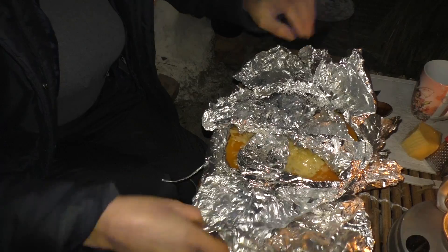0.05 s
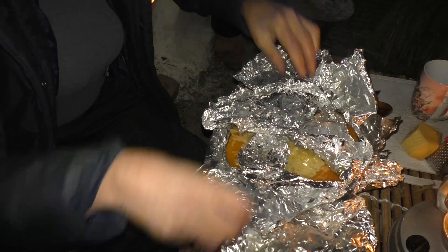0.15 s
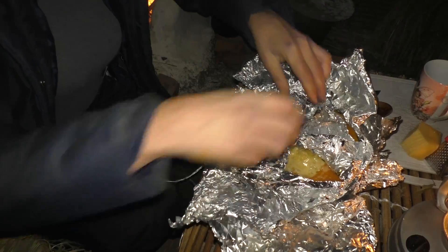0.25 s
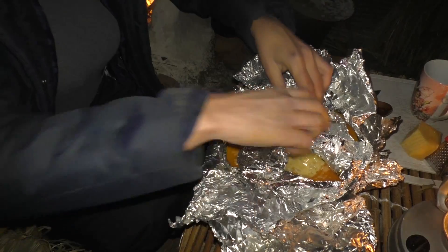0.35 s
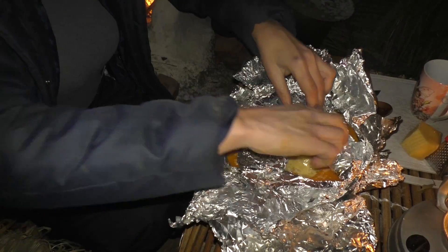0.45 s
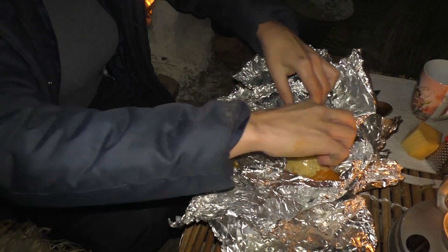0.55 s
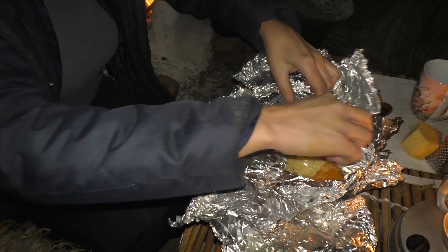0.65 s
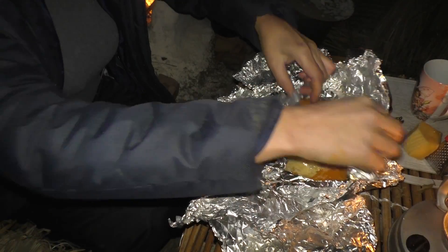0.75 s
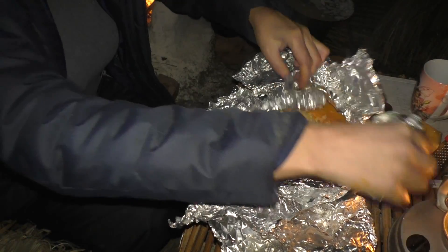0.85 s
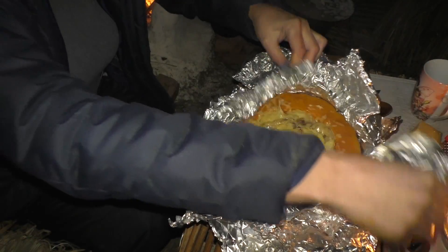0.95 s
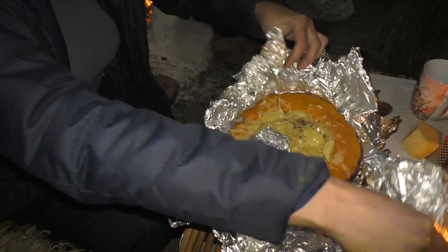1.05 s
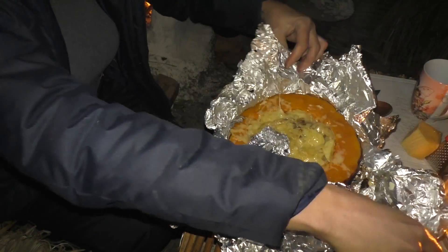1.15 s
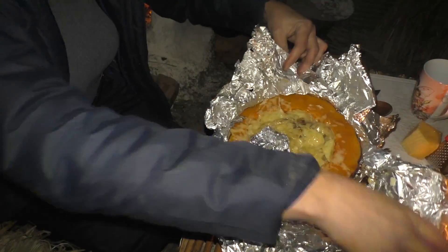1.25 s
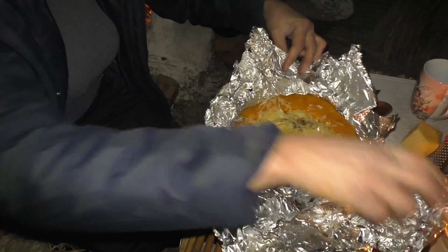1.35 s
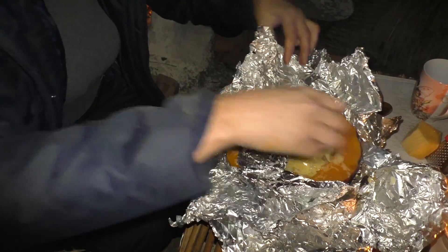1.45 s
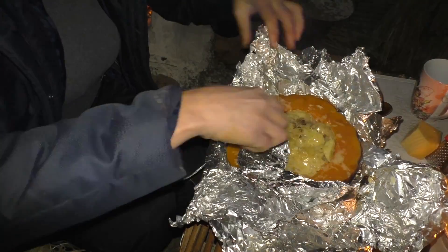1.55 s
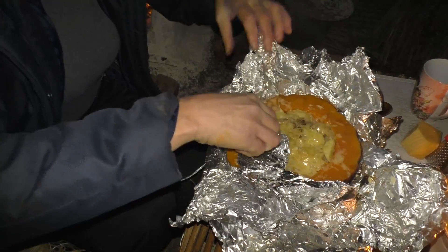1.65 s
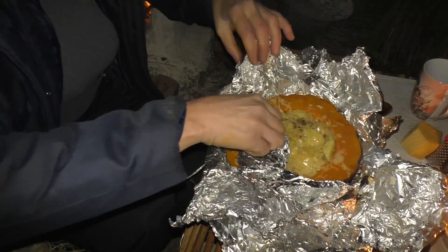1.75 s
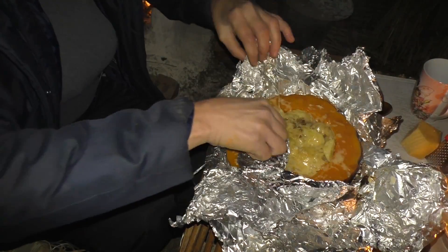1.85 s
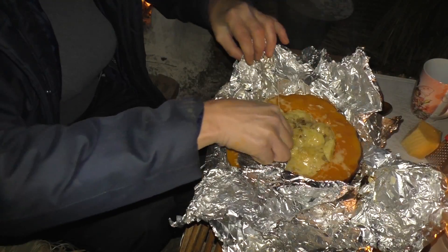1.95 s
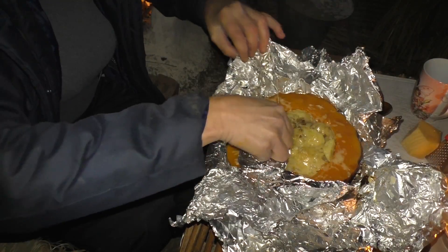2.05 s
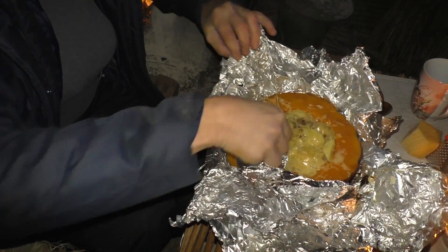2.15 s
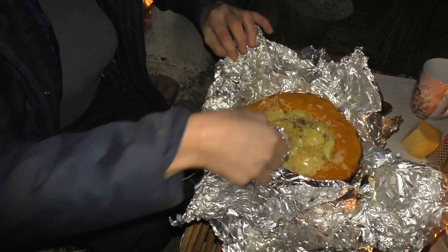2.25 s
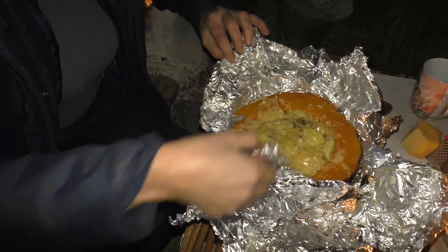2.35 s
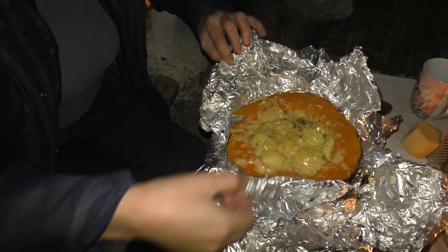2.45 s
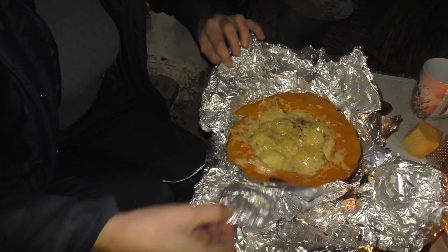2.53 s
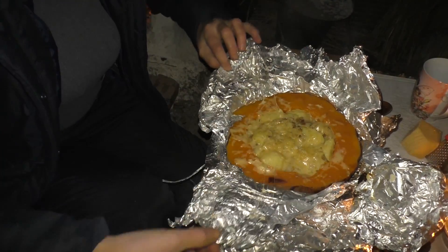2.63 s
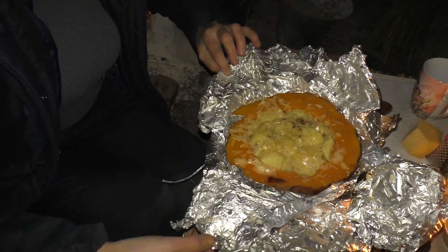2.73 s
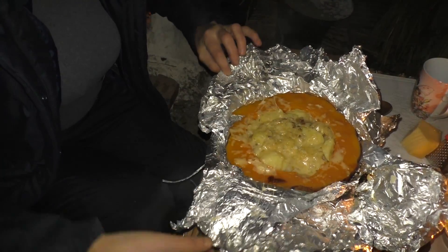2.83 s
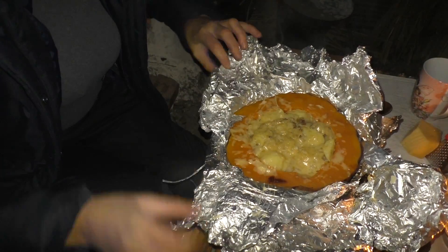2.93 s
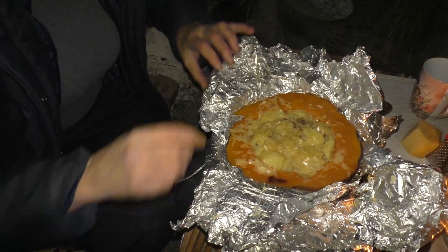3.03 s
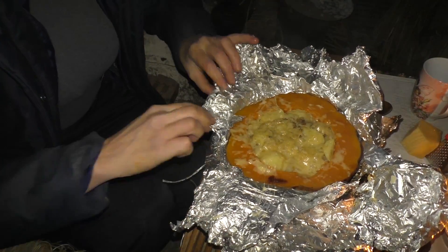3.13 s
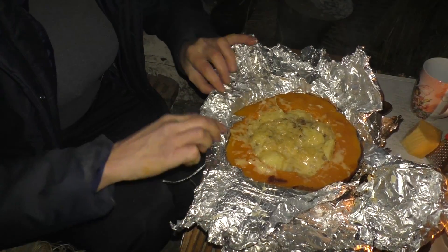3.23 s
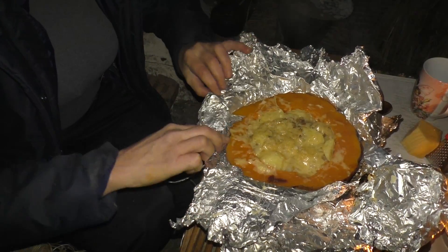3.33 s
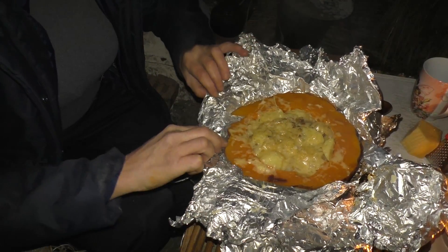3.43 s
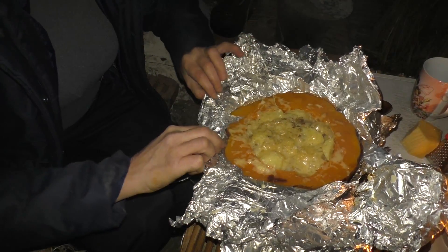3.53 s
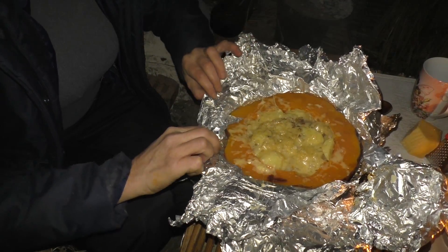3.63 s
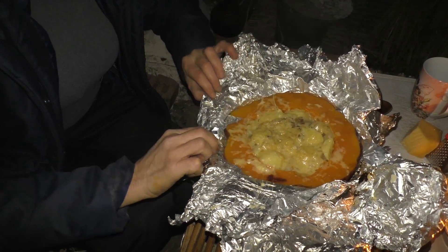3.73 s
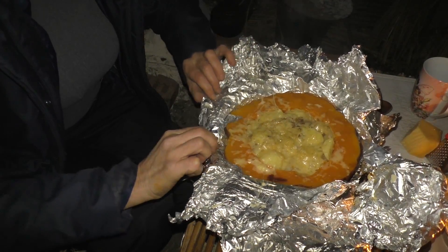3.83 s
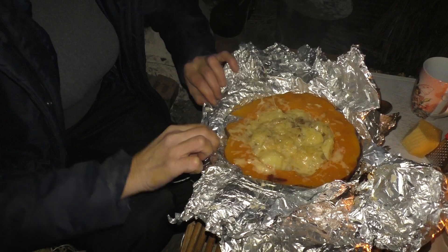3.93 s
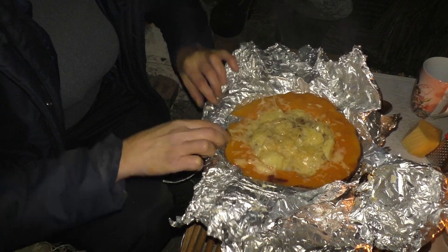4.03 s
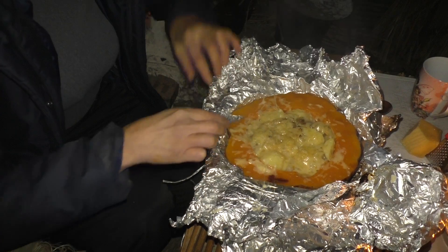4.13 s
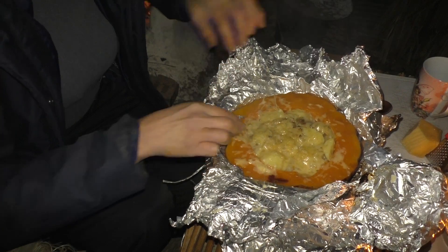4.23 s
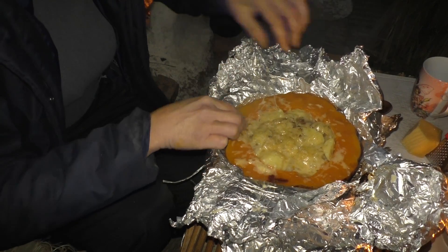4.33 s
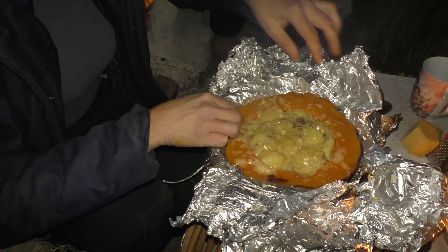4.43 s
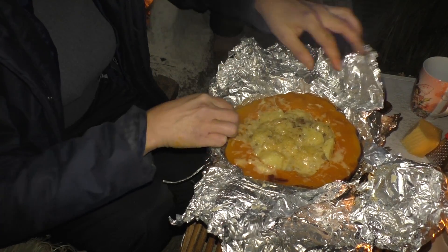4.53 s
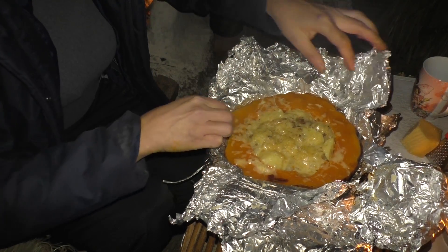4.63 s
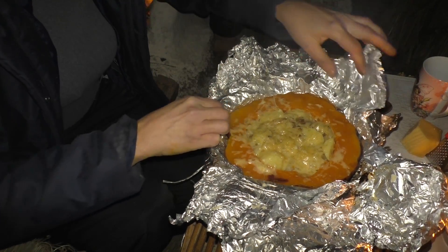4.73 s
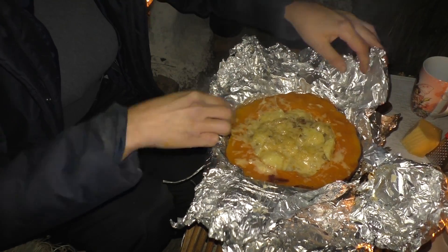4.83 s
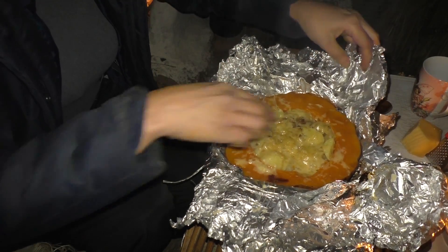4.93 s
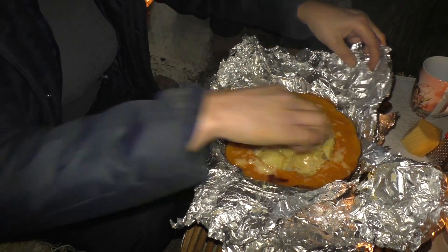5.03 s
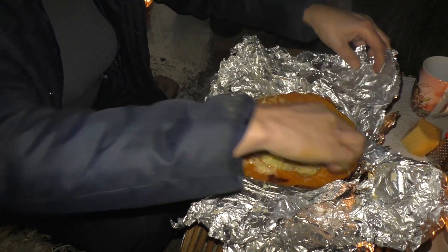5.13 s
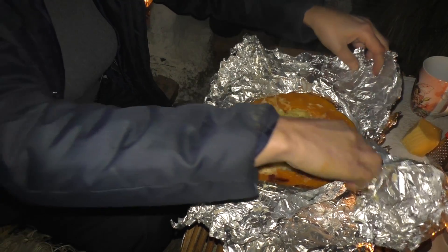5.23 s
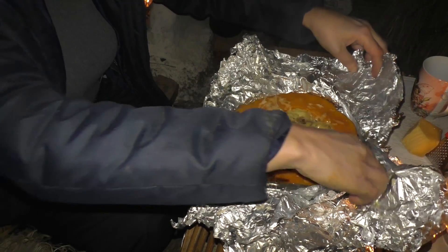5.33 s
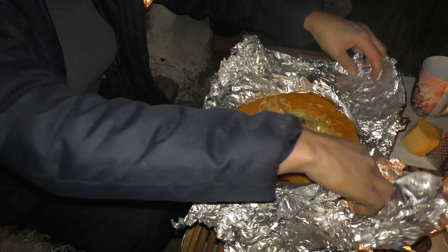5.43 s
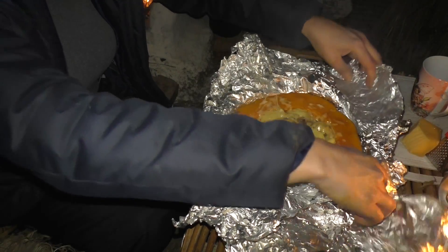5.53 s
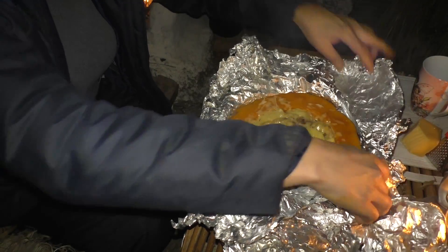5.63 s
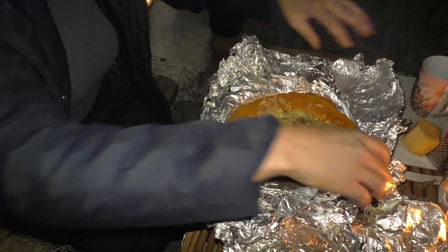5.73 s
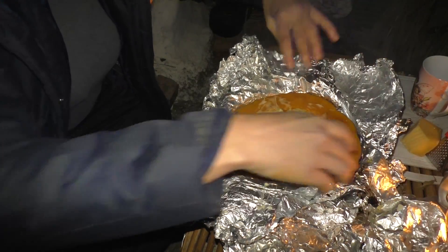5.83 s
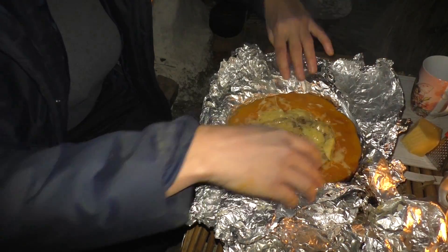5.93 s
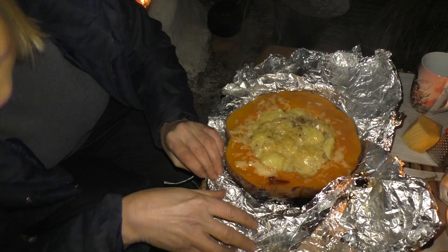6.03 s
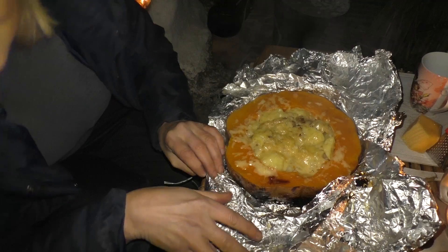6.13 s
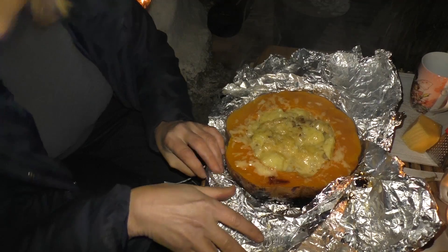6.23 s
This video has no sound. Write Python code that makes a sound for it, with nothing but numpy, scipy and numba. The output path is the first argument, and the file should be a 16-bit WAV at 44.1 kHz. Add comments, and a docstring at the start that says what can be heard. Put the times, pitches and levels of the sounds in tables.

```python
"""A small room, close up: two hands peel crumpled aluminium foil back from a baked, filled loaf.
Bending makes countless tiny facets buckle and ring, lesser creases tick and the whole sheet flutters.
Now and then a crease snaps and sets off a run of buckles, or a large free facet pings.
Fingers bump the loaf and the sheet under it, over faint low room noise and microphone hiss."""
import sys
import numpy as np
from scipy import signal
from scipy.fft import rfft, irfft, next_fast_len
from scipy.io import wavfile
from scipy.ndimage import uniform_filter1d, map_coordinates
from numba import njit

SR = 44100
rng = np.random.default_rng(int(sys.argv[2]) if len(sys.argv) > 2 else 0)


def int16_out(signal):
    """Quantize to a 16-bit WAV file."""
    q = np.round(np.clip(np.atleast_2d(signal).T, -1, 1) * 32767)
    wavfile.write(sys.argv[1], SR, q.astype(np.int16))


N = 276948
TIME_S = np.arange(N) / SR
TOP_HZ = 15900
SIDE = np.array([[1], [-1]])

# Event levels are relative, before the mix gains.
# hand pulls and pushes: (start [s], length [s], crinkle level [dB], treble over body [dB])
FOLDS = [(-0.03, 0.095, -21.5, 1.5), (0.075, 0.15, -34.5, 0), (0.375, 0.19, -43.5, -5),
         (0.647, 0.11, -40, -1), (0.734, 0.16, -33.5, 0), (0.868, 0.062, -24.5, 0), (0.963, 0.08, -36, 0),
         (1.056, 0.067, -28.5, 1), (1.116, 0.063, -22.5, 2), (1.224, 0.15, -29.5, -3),
         (1.446, 0.079, -34.5, -3.5), (2.015, 0.4, -42, -2.5), (2.24, 0.1, -35.5, -2.5),
         (2.35, 0.43, -35.5, 0.5), (2.584, 0.23, -29.5, 0), (2.892, 0.12, -30, -3.5),
         (3.163, 0.097, -34, -1), (3.296, .15, -32.5, -2.5), (3.487, 0.16, -35.5, -3.5),
         (3.65, 0.075, -33, 1.5), (3.779, 0.217, -34, -1.5), (4.002, 0.18, -34.5, -0.5),
         (4.243, 0.22, -43.5, -3.5), (4.485, 0.25, -36, -4), (4.856, 0.26, -36, -4.5),
         (5.04, .15, -36.5, -1.5), (5.187, 0.44, -29.5, -2), (5.47, 0.22, -21.5, -1),
         (5.903, 0.38, -42, -6.5), (6.12, 0.2, -37.5, -1.5)]
# snapping creases: (time [s], run level [dB], treble over body [dB], run decay [s])
SNAPS = [(0.102, -35, 8, 0.0057), (0.247, -31, 8, 0.011), (0.387, -32, -3.5, 0.0094),
         (0.534, -30.5, 3, 0.02), (0.561, -48, 15, 0.0024), (0.632, -35, 4.5, 0.036),
         (0.689, -22, -4, 0.0032), (0.726, -24, -4, 0.0061), (0.767, -25, -9, 0.013),
         (0.907, -29, -8, 0.024), (0.935, -19.5, 3.5, 0.0046), (1.053, -19, -2, 0.0061),
         (1.059, -19, -3.5, .004), (1.096, -26, 1, 0.0089), (1.202, -17.5, -2, 0.0053),
         (1.34, -23, -6, .013), (1.369, -22, -5, 0.0028), (1.403, -31, 9.5, 0.011), (1.479, -28, -3, 0.02),
         (1.587, -17.5, -10.5, 0.0062), (1.901, -34, -3.5, 0.026), (2.09, -43.5, 13, 0.0033),
         (2.136, -36.5, 1, 0.014), (2.204, -39, 11, 0.011), (2.2237, -38, 17.5, 0.0033),
         (2.41, -26.5, 3.5, 0.0082), (2.43, -21, 1.5, 0.008), (2.465, -41, 15, 0.0027),
         (2.554, -26.5, -1.5, 0.0036), (2.617, -16, -6, 0.0043), (2.733, -24.5, 8, 0.0081),
         (2.822, -42.5, 24, 0.007), (2.853, -23, -1, .005), (2.947, -17, -6.5, 0.0064),
         (2.869, -23.5, -11, 0.0087), (3.018, -28, -12, .004), (3.058, -36.5, 15.5, 0.0027),
         (3.225, -22.5, 4.5, 0.0074), (3.237, -22.5, 0, 0.0093), (3.323, -21.5, 0, .006),
         (3.333, -24.5, -8, 0.0035), (3.5, -29.5, 10, 0.0042), (3.585, -26, 1, 0.0038),
         (3.699, -19, -6, .014), (3.827, -35.5, 5, 0.01), (3.916, -27.5, -8, 0.015),
         (3.971, -24, 2, 0.0047), (4.026, -23.5, 2, .015), (4.068, -19, 0.5, 0.006),
         (4.119, -21.5, -5.5, 0.01), (4.228, -27.5, -2, 0.0037), (4.35, -31.5, 2, 0.024),
         (4.634, -23, 2.5, 0.0026), (4.67, -38.5, 15, 0.0071), (4.717, -31, 5, 0.021),
         (4.807, -30, -3.5, 0.023), (4.914, -27.5, 0.5, .013), (4.953, -42, 17.5, 0.0094),
         (4.986, -26, -0.5, 0.017), (5.024, -24.5, 7.5, 0.012), (5.211, -28, 0, 0.0037),
         (5.346, -16.5, -3, 0.016), (5.4, -25, 1, 0.026), (5.481, -24, -3, 0.018), (5.552, -20, 3.5, 0.018),
         (5.707, -24.5, -2, 0.021), (5.921, -27, -12, 0.0057), (5.958, -28, 0.5, 0.0085),
         (6.025, -28, -7.5, 0.0091), (6.092, -29, 5.5, 0.0099), (6.159, -28.5, -1, 0.0068),
         (6.169, -27, 6, 0.016), (6.196, -23, -17, 0.0054)]
# fingers on the loaf: (time [s], level [dB], pitch [Hz])
BUMPS = [(0.887, -28.5, 280), (0.932, -28, 235), (1.058, -31, 470), (1.163, -24, 318), (1.202, -23, 360),
         (1.585, -23, 310), (1.625, -39, 109), (1.776, -38, 120), (1.854, -39, 126), (2.428, -28.5, 460),
         (3.235, -27.5, 330), (3.912, -31, 427), (4.034, -35, 325), (4.068, -29, 380), (4.721, -29, 298),
         (5.342, -29, 327)]
# large free facets: (time [s], level [dB], pitch [Hz])
PINGS = [(1.032, -23.5, 1360), (1.058, -16, 1260), (1.097, -20, 4100), (1.37, -26, 1710),
         (1.481, -25, 1580), (1.495, -23, 2060), (2.616, -20, 1420), (2.869, -31, 1360), (2.946, -21, 1580),
         (3.191, -23.5, 3250), (3.382, -24.5, 1390), (3.499, -19.5, 4520), (3.886, -25.5, 1390),
         (3.97, -14, 3080), (4.039, -21, 1420), (4.634, -21, 2370), (4.913, -26, 1340), (5.212, -24, 2380),
         (5.347, -14.5, 2390)]
# where the foil is worked: (time [s], leftward pan [dB])
PAN = [(0.0, -3), (0.35, 1.5), (0.52, -3), (1.28, -4.5), (1.7, -0.5), (2.76, -2.5), (3.02, -2.0),
       (3.18, -1.5), (4.3, -1.5), (5.32, -3.5), (5.81, -3), (5.96, -1.5), (6.28, -0.5)]
# radiation of the crumpled sheet: (frequency [Hz], gain [dB])
SHEET_SPECTRUM = [(400, -33), (800, -14), (1060, -0.5), (1380, 2), (1650, -2), (1920, 0.5), (3200, -1.5),
                  (3950, -5), (4700, -10.5), (6300, -13.5), (8650, -8.5), (11800, -7), (14000, -14),
                  (16000, -17)]
# whole sheet flexing: (frequency [Hz], gain [dB])
FLEX_SPECTRUM = [(40, -27.5), (110, -1.5), (200, -3.5), (330, 0), (450, -2.5), (620, -9), (780, -6.5),
                 (1100, -32), (3000, -58)]
# still room: (frequency [Hz], gain [dB])
ROOM_SPECTRUM = [(20, -15), (60, -2), (115, -1), (200, -8.5), (370, -8), (600, -17.5), (780, -4.5),
                 (1100, -21), (1550, -4), (1900, -15), (4000, -48), (16000, -62)]
# difference between the two microphones: (frequency [Hz], gain [dB])
SIDE_EQ = [(150, 3.5), (600, -3.5), (1300, -5), (2600, -2), (6000, -2.5), (9000, -9.5), (13000, 2.5)]


def amp(db):
    """Decibels to gain."""
    return 10 ** (np.asarray(db) / 20)


def unit(x):
    """Scale to rms 1."""
    return x / np.sqrt(np.mean(x ** 2))


def add(track, start_s, sound):
    """Mix a sound into a track."""
    i = max(int(start_s * SR), 0)
    track[..., i:i + sound.shape[-1]] += sound[..., :N - i]


def butter(x, order, hz, kind):
    """Butterworth filter."""
    return signal.sosfilt(signal.butter(order, hz, kind, fs=SR, output="sos"), x)


def colour(x, spectrum):
    """Minimum-phase filter through (frequency [Hz], gain [dB]) points."""
    hz, db = np.transpose(spectrum)
    size = next_fast_len(N + 8192)
    bins_hz = np.maximum(np.arange(size // 2 + 1) * SR / size, 1)
    gain = amp(np.interp(np.log(bins_hz), np.log(hz), db))
    cepstrum = irfft(np.log(gain), size)
    cepstrum[1:size // 2] *= 2
    cepstrum[size // 2 + 1:] = 0
    return irfft(rfft(x, size) * np.exp(rfft(cepstrum)), size)[..., :N]


def steady(x, span_s):
    """Hold power at 1 over a span; finer grain stays."""
    power = uniform_filter1d(np.mean(x ** 2, axis=0), int(span_s * SR))
    return x / np.sqrt(power + 1e-12)


def stereo_noise(side_db):
    """White noise, common to both channels but for a weaker side part."""
    mid, side = rng.standard_normal((2, N))
    return mid + amp(side_db) * side * SIDE


def folding(attack_s=0.022, swell_db=2.5, release_s=0.051):
    """Body and treble gains: each fold grips, swells as the foil resists, dies as the hand stops."""
    power = amp([[-50.5], [-54.5]]) ** 2 * np.ones(N)  # resting fingers keep the sheet astir
    for start_s, length_s, db, treble_db in FOLDS:
        age_s = TIME_S - start_s
        grip = np.clip(age_s / attack_s, 0, 1)
        swell = amp(swell_db * (np.clip(age_s / length_s, 0, 1) - 1.5))
        release = np.exp(-np.maximum(age_s - length_s, 0) / release_s)
        power += (amp([[db], [db + treble_db]]) * grip * swell * release) ** 2
    return np.sqrt(power)


def stick_and_yield(depth_db, per_s):
    """Random gain swings as the foil gives way in fits."""
    wander = map_coordinates(rng.standard_normal(1024), [TIME_S * per_s], order=2, mode="wrap")
    return amp(depth_db * wander)


@njit
def ring(start, hz, cycles, left, right):
    """Sum of damped sines, each falling by 1/e in `cycles` periods."""
    out = np.zeros((2, N))
    for k in range(len(start)):
        step = hz[k] / SR
        pole, z = np.exp(2j * np.pi * step - step / cycles), 1 + 0j
        for i in range(int(start[k]), min(N, int(start[k] + 5 * cycles / step))):
            z *= pole
            out[0, i] += left[k] * z.imag
            out[1, i] += right[k] * z.imag
    return out


def buckles(per_s, scatter_db, cycles, spread, modes=5):
    """Facets pop at random, many weak and few strong, each with a few short modes."""
    draws = rng.random((40000, 3 + 3 * modes))[:int(per_s * N / SR)]
    when, rank, side = draws[:, :3].T[:, :, None]
    pitch, share, lobe = np.split(draws[:, 3:], 3, axis=1)
    hz = (30 + 100 * pitch) ** 2
    strength = amp(-scatter_db * np.log(.004 + rank))
    gain = strength * (2 * share - 1) * (hz / SR) ** .75  # short high modes need more swing
    lean = spread * (side + lobe - 1)  # each mode beams its own way
    start = np.repeat(np.floor(when * N), modes)
    return ring(start, hz.ravel(), cycles, (gain * (1 + lean)).ravel(), (gain * (1 - lean)).ravel())


def sheet_scatter(x, decay_s, wet_db):
    """Pops scatter among the creases into short diffuse tails, new each time as the sheet deforms."""
    pole = np.exp(-2 / (decay_s * SR))
    power = signal.lfilter([1 - pole], [1, -pole], np.mean(x ** 2, axis=0) + 1e-18)
    return x + amp(wet_db) * np.sqrt(power) * stereo_noise(side_db=-10)


def patches(frames_s, bins_hz, span_s, width_hz):
    """Smooth random field over time and frequency."""
    grid = np.meshgrid(bins_hz / width_hz, frames_s / span_s, indexing="ij")
    return map_coordinates(rng.standard_normal((128, 1024)), grid, order=2, mode="wrap")


def sheet_bend(x, panel_db, mode_db):
    """As the sheet bends, other panels take over and resonances shift."""
    bins_hz, frames_s, spectra = signal.stft(x, SR, nperseg=256)
    panels = patches(frames_s, bins_hz, span_s=.014, width_hz=2400)
    modes = patches(frames_s, bins_hz, span_s=.026, width_hz=300)
    spectra *= amp(panel_db * panels + mode_db * modes)
    return signal.istft(spectra, SR, nperseg=256)[1][:, :N]


def crinkle(body_gain, treble_gain, pops, even_s, split_hz=5000):
    """Pops ring on in the sheet and take its colour; the hands set body and treble strength."""
    ringing = sheet_scatter(pops, decay_s=.008, wet_db=-2)
    shifting = sheet_bend(ringing, panel_db=2.3, mode_db=2.8)
    radiated = colour(shifting, SHEET_SPECTRUM)
    body = steady(butter(radiated, 4, split_hz, "low"), even_s)
    treble = steady(butter(radiated, 4, split_hz, "high"), even_s)
    return body_gain * body + treble_gain * treble


def flexing():
    """Low flutter of the whole sheet, nearly mono."""
    return unit(colour(stereo_noise(side_db=-12), FLEX_SPECTRUM))


def ticks(bending, per_s=40, level_db=8.5, scatter_db=6.5, decay_s=.00025):
    """Lesser creases tick at random, as strong as the bending."""
    out, t = np.zeros((2, N)), TIME_S[:SR // 100]
    for _ in range(int(per_s * N / SR)):
        start_s = rng.random() * N / SR
        size, lean = rng.standard_normal(2)
        tick = rng.standard_normal(len(t)) * np.exp(-t / decay_s)
        add(out, start_s, amp(level_db + scatter_db * min(size, 2)) * tick * (1 + .2 * lean * SIDE))
    return butter(out, 2, 4000, "high") * bending


def room_echoes(x, delay_s, decay_s, wet_db, width):
    """The small room adds a dense tail, partly different per channel."""
    t = TIME_S[:SR // 3]
    noise = rng.standard_normal((3, len(t)))
    tail = (noise[0] + width * noise[1:]) * np.exp(-t / decay_s) * (t > delay_s)
    tail *= amp(wet_db) / np.sqrt(np.sum(tail ** 2, axis=1, keepdims=True))
    return x + signal.fftconvolve(x, tail, axes=1)[:, :N]


def noise_floor():
    """Low room noise, stronger on the right, and microphone hiss."""
    room = unit(colour(stereo_noise(side_db=-3), ROOM_SPECTRUM)) * amp([[-55], [-50]])
    hiss = amp(-59) * rng.standard_normal((2, N))
    return room + hiss


def runs(rise_share):
    """Body and treble gains of the buckles after each snap; long runs build more slowly."""
    gains, t = np.zeros((2, N)), TIME_S[:SR // 6]
    for start_s, db, treble_db, decay_s in SNAPS:
        swell = (1 - np.exp(-t / (rise_share * decay_s))) * np.exp(-t / decay_s)
        add(gains, start_s, amp([[db], [db + treble_db]]) * swell)
    return gains


def facet(hz, decay_s, tail_db, tail_s, count=8):
    """A facet's main mode swings widest as it flips; weak neighbours ring a little longer."""
    t = TIME_S[:SR // 25]
    near_hz = hz * np.exp(0.27 * rng.standard_normal((count, 1)))
    neighbours = rng.standard_normal(count) @ np.sin(2 * np.pi * near_hz * t) / np.sqrt(count)
    swing = np.exp(-t / decay_s) * (1 + 0.98 * np.exp(-t * hz))
    return np.sin(2 * np.pi * hz * t) * swing + amp(tail_db) * neighbours * np.exp(-t / tail_s)


def crease_snaps(note_db=-3, crack_db=12.5, crack_s=.0004, octaves_per_db=0.6):
    """A facet flips with a crack and a short note; the shorter the run, the harder the crack."""
    out, t = np.zeros((2, N)), TIME_S[:SR // 25]
    for start_s, db, treble_db, run_s in SNAPS:
        # small facets snap bright and ring high, large ones dull and low
        hz = np.clip(2450 * 2 ** (octaves_per_db * treble_db), 1460, 4500)
        note = amp(db + note_db) * facet(hz, min(0.38 * run_s, 0.0038), tail_db=-17, tail_s=0.0049)
        burst = rng.standard_normal(len(t)) * np.exp(-t / crack_s)
        hardness = amp(db + treble_db + crack_db) / (1 + run_s / 0.0076)
        crack = hardness * butter(burst, 1, [5360, TOP_HZ], "band")
        lean = 0.13 * rng.standard_normal() * SIDE
        add(out, start_s, (note + crack) * (1 + lean))
    return butter(out, 2, 800, "high")  # a facet moves too little air for bass


def loaf_bumps(cycles=1.02, tone_db=-4.0, flap_s=0.011, flap_db=-10.5, jolt_db=-13.5, jolt_hz=377):
    """Fingers and snaps jolt the soft loaf, damped within a few cycles; the sheet flaps briefly."""
    tone, push, t = np.zeros(N), np.zeros(N), TIME_S[:SR // 8]
    jolts = [(start_s, db + jolt_db, jolt_hz * np.exp(0.24 * rng.standard_normal()))
             for start_s, db, _, _ in SNAPS]
    for start_s, db, hz in list(BUMPS) + jolts:
        age = t * hz / cycles
        add(tone, start_s, amp(db) * np.sin(2 * np.pi * hz * t) * age * np.exp(1 - age))
        add(push, start_s, amp(db) * np.exp(-t / flap_s))
    return amp(tone_db) * tone + amp(flap_db) * push * flexing()


def pings():
    """Large facets, free of the loaf, ring with a brief tinny note."""
    out = np.zeros(N)
    for start_s, db, hz in PINGS:
        add(out, start_s, amp(db) * facet(hz, decay_s=0.0032, tail_db=-20, tail_s=0.0075))
    return out


def scene():
    """Foil and loaf, panned with the hands, in the room."""
    fold_body, fold_treble = folding() * stick_and_yield(depth_db=1.84, per_s=45)
    run_body, run_treble = runs(rise_share=0.14)
    fold_pops = buckles(per_s=2400, scatter_db=1.0, cycles=2.6, spread=0.98)
    fine = amp(-0.73) * crinkle(fold_body, fold_treble, fold_pops, even_s=0.037)
    run_pops = buckles(per_s=3000, scatter_db=0.5, cycles=1.02, spread=1.0)
    bursts = amp(-0.03) * crinkle(run_body, run_treble, run_pops, even_s=0.0061)
    snaps = amp(-1.5) * crease_snaps()
    # the sheet flexes as facets give way, growing more slowly than the crinkle
    flex = (amp(-24.0) * fold_body ** 0.69 + amp(-23.5) * run_body) * flexing()
    foil = fine + bursts + snaps + flex + loaf_bumps() + ticks(fold_treble) + pings()
    pan_db = np.interp(TIME_S, *np.transpose(PAN))
    panned = foil * amp(SIDE * pan_db / 2)
    return room_echoes(panned, delay_s=0.0055, decay_s=0.016, wet_db=-15, width=1.1) + noise_floor()


def record(dry):
    """Close microphone pair; deepest bass and top cut."""
    mid = (dry[0] + dry[1]) / 2
    side = colour((dry[0] - dry[1]) / 2, SIDE_EQ)
    pair = butter(mid + SIDE * side, 2, 32.8, "high")
    return signal.sosfilt(signal.ellip(10, .2, 70, TOP_HZ, fs=SR, output="sos"), pair)


dry = scene()
out = record(dry)
int16_out(out)
```